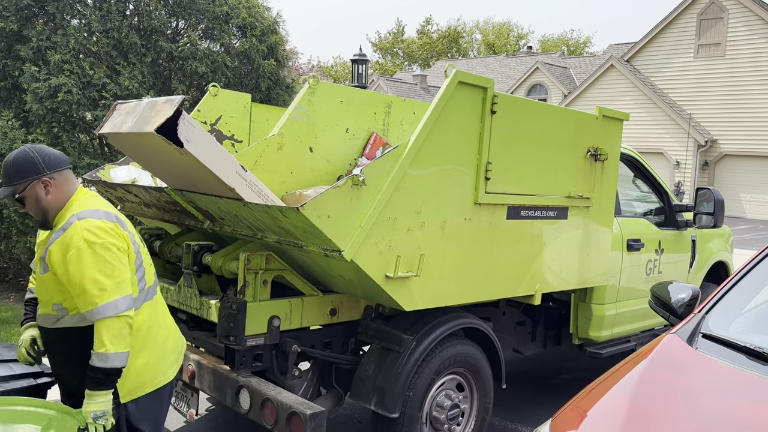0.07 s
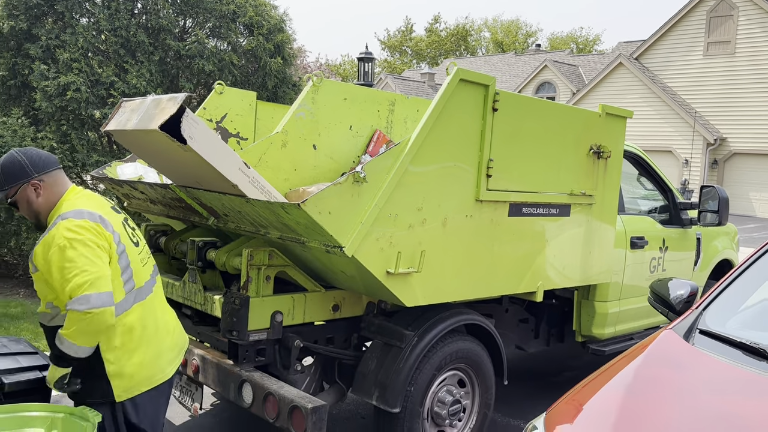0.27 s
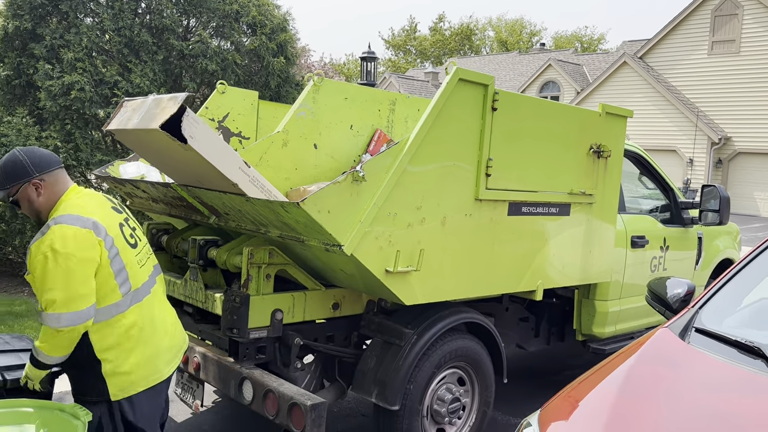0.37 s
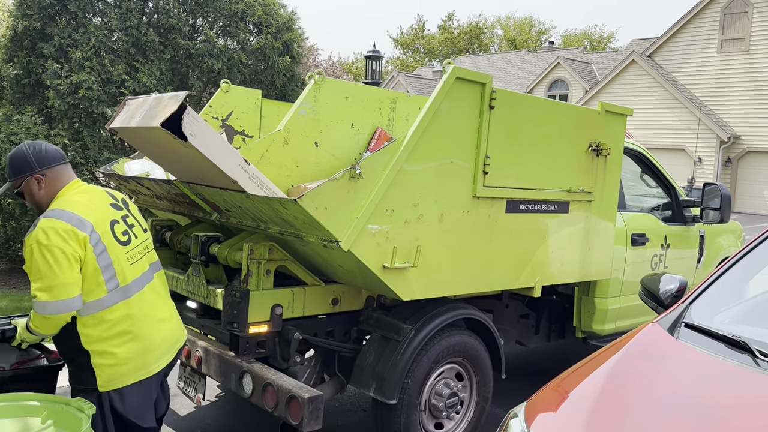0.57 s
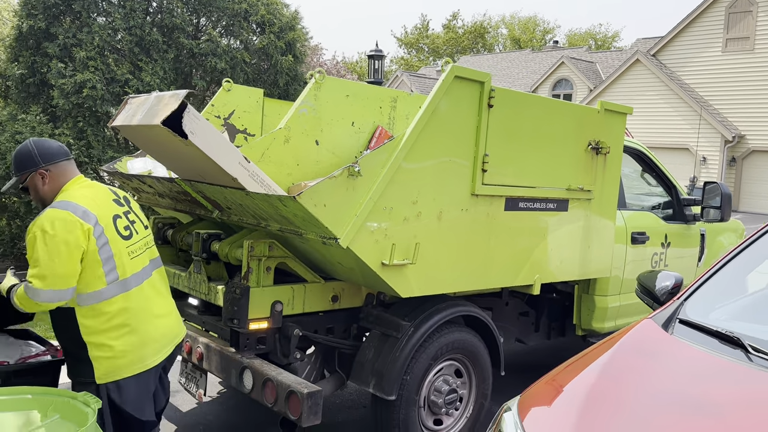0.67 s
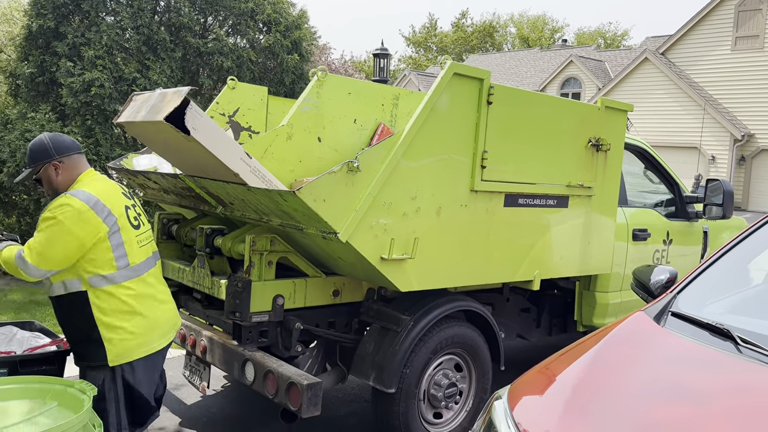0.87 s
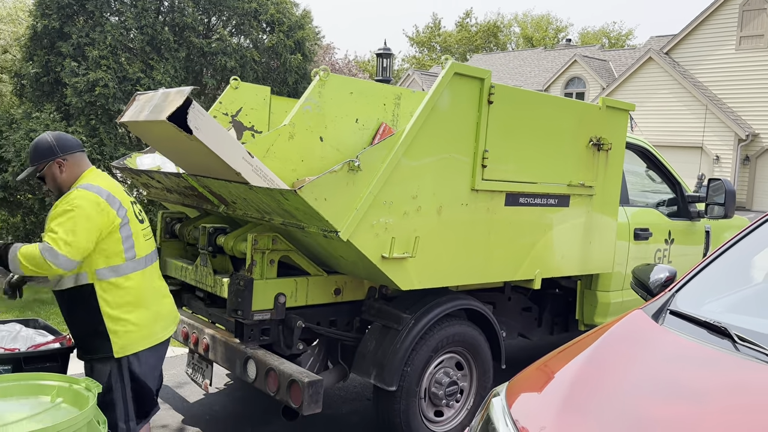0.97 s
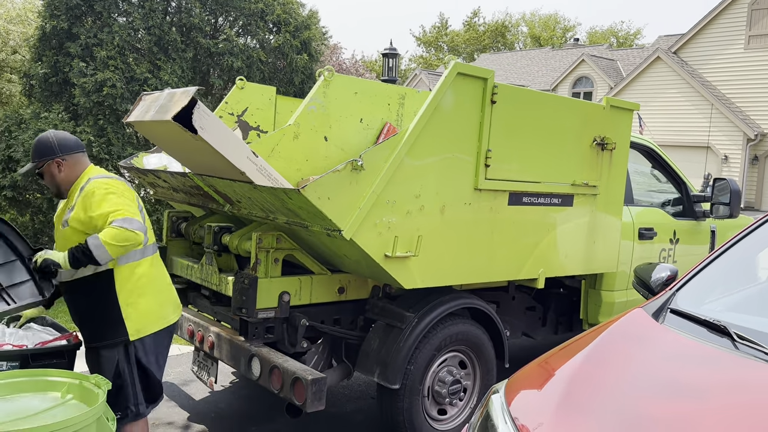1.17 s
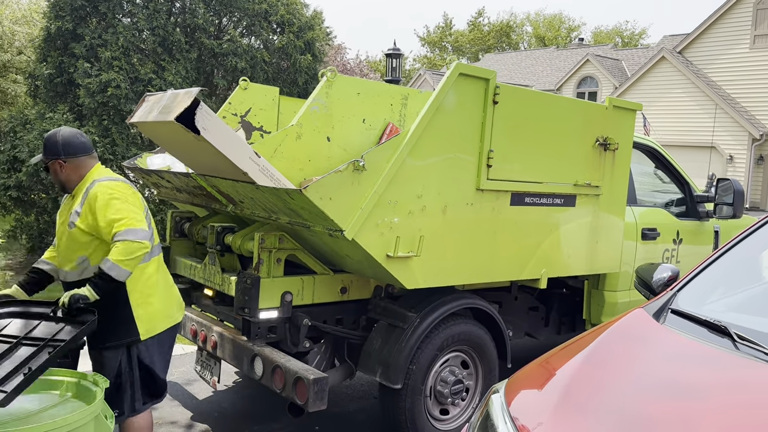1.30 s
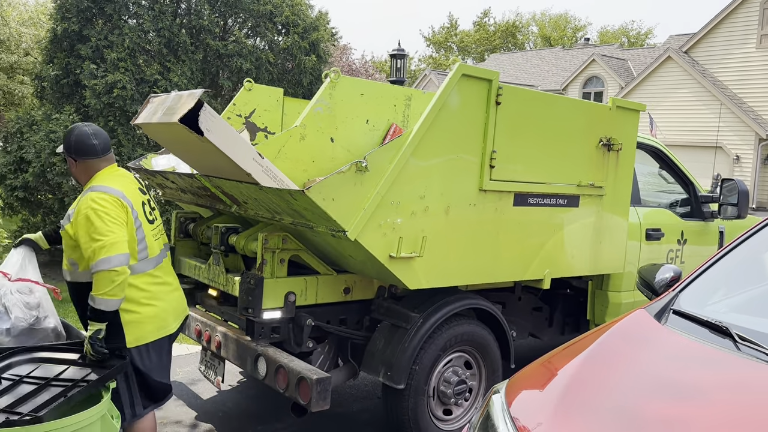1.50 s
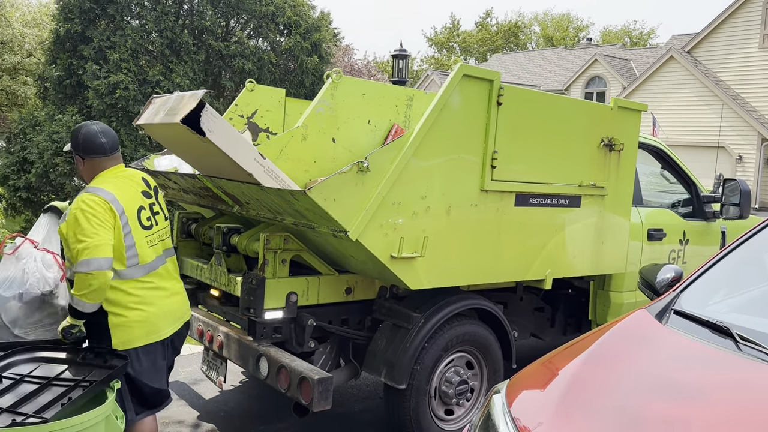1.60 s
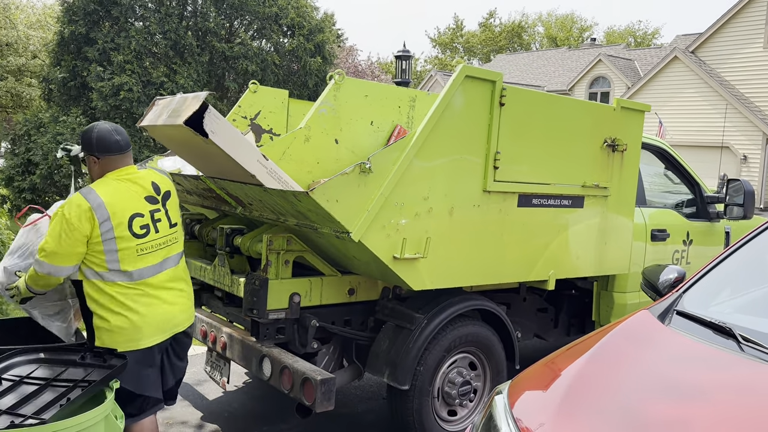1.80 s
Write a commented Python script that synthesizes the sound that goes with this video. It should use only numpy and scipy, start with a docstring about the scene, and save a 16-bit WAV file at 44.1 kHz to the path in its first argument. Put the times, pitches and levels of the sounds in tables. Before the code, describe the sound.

Plastic bin knocks and rocks, its lid bangs and a bag rustles while a truck idles.

```python
"""On a driveway, a hollow plastic wheelie bin is set down: it booms, clatters and rocks to rest.
Its lid is unlatched, flung open, slaps and bounces, and a bin bag rustles as it is lifted out.
Each impact excites damped modes: low in the hollow body, higher in the walls and rims.
The ground, a truck and house fronts scatter the knocks. Underneath, the idling truck's
firing pulses drive the resonances of its exhaust, over a wash of fan and distant traffic."""
import sys
import numpy as np
from scipy import signal
from scipy.fft import rfft, irfft
from scipy.io import wavfile
from scipy.ndimage import uniform_filter1d

SR = 44100
rng = np.random.default_rng(int(sys.argv[2]) if len(sys.argv) > 2 else 0)


def transcribe(signal):
    """Save signal, clipped to [-1, 1], as a 16-bit WAV file at the path in sys.argv[1]."""
    frames = np.atleast_2d(signal).T
    limited = np.clip(frames, -1, 1)
    pcm = np.round(limited * 32767).astype(np.int16)
    wavfile.write(sys.argv[1], SR, pcm)


N = 81585
TOP_HZ = 16000


def undb(db):
    """Amplitude ratio of a level in decibels."""
    return 10 ** (np.asarray(db) / 20)


def unit(x):
    """Normalisation to an rms of 1."""
    return x / np.sqrt(np.mean(x ** 2) + 1e-20)


def at(table, hz, column=1):
    """Interpolation of a table column along log frequency."""
    rows = np.array(table, float)
    return np.interp(np.log(np.maximum(hz, 1)), np.log(rows[:, 0]), rows[:, column])


def colour(x, spectrum):
    """Zero-phase filtering by a curve of (frequency [Hz], gain [dB])."""
    return irfft(rfft(x) * undb(at(spectrum, np.fft.rfftfreq(N, 1 / SR))), N)


def decay(t, t60):
    """Exponential damping: 60 dB in t60 seconds."""
    return np.exp(-np.log(1000) * t / max(t60, 1e-3))


def add(out, start, x):
    """Superposition of x onto out from a start time in seconds."""
    i = int(np.clip(start * SR, 0, N - 1))
    size = min(x.shape[-1], N - i)
    out[..., i:i + size] += x[..., :size]


def stereo(x, lag_s=0.0002664):
    """Path difference: sound reaches the right microphone slightly later."""
    delay = np.exp(-2j * np.pi * np.fft.rfftfreq(N, 1 / SR) * lag_s)
    return np.array([x, irfft(rfft(x) * delay, N)])


def ring(modes, t, pitch=1):
    """Modal impulse response: a sum of damped sinusoids."""
    return sum(undb(db) * np.sin(2 * np.pi * hz * pitch * t) * decay(t, t60) for hz, db, t60 in modes)


def opposed_ring(modes, t, pitch=1):
    """Interference: neighbouring modes start in antiphase, so their sum builds up and beats."""
    return sum((-1) ** k * ring([mode], t, pitch) for k, mode in enumerate(modes))


# spectrum of fan and traffic (frequency [Hz], relative level [dB])
WASH_SPECTRUM = [(40, 6.5), (150, 7.5), (250, 1.5), (360, 4.5), (520, -9), (820, 0.5), (1300, -10.5),
                 (2600, -11.5), (4000, -24), (8000, -24), (12000, -50.5), (16000, -56)]


def fan_and_traffic(level_db=-44.5):
    """Partly coherent noise: the engine fan and far traffic merge into a steady, wide wash."""
    noise = colour(rng.standard_normal((3, N)), WASH_SPECTRUM)
    return undb(level_db) * unit(0.61 * noise[0] + noise[1:])


# eight cylinders in firing order (relative level [dB])
CYLINDER_DB = [6, 0, 1.5, 4, 3, 6.5, 1.5, 1]
# exhaust pipe and body resonances (frequency [Hz], level [dB], T60 [s])
PIPE_MODES = [(40.3, -4.5, 0.11), (64.5, -1, 0.59), (80.3, -1.5, 0.24), (120.8, -6.5, .16),
              (150.3, -5.5, 0.2)]
# exhaust response (frequency [Hz], gain [dB])
EXHAUST_RESPONSE = [(20, -30), (38, -1.5), (50, 13), (80, -1.5), (100, 1.5), (155, -1), (200, -6),
                    (400, -14), (1500, -38)]


def idling_truck(firing_hz=40.23, jitter_s=0.00092, scatter_db=2, level_db=-32.5):
    """Source and filter: a train of uneven firing pulses drives the exhaust resonances."""
    pulses = np.zeros(N)
    for k, (late, size) in enumerate(rng.standard_normal((int(N / SR * firing_hz), 2))):
        pulse_db = CYLINDER_DB[k % len(CYLINDER_DB)] + scatter_db * size
        add(pulses, (k + .5) / firing_hz + jitter_s * late, undb([pulse_db]))
    pipe = opposed_ring(PIPE_MODES, np.arange(N) / SR)
    exhaust = irfft(rfft(pulses) * rfft(pipe), N)
    return undb(level_db) * unit(colour(exhaust, EXHAUST_RESPONSE))


# envelope of the rustle (time [s], level [dB])
RUSTLE_ENVELOPE = [(0, -58), (.6, -57.5), (.72, -60), (.8, -85), (1.029, -61.5), (1.18, -53.5), (1.24, -50),
                   (1.27, -45.5), (1.33, -49), (1.37, -45), (1.6, -46), (1.7, -48.5), (1.78, -49.5),
                   (1.85, -49)]
# spectrum of the film (frequency [Hz], relative level [dB])
FILM_SPECTRUM = [(300, 7), (900, 9.5), (2500, 4.5), (5000, 1.5), (9000, 4), (11500, -24.5), (14500, -1.5),
                 (16000, -36)]


def bin_bag(crinkles_per_s=5000, scatter_db=2.5):
    """Shot noise: dense, random crinkles of thin plastic film fuse into a rustle."""
    occurs = rng.random((3, N)) < crinkles_per_s / SR
    crinkles = occurs * rng.standard_normal((3, N))
    crinkles *= undb(scatter_db * rng.exponential(size=(3, N)).clip(0, 6))
    film = unit(colour(crinkles, FILM_SPECTRUM))
    envelope = undb(np.interp(np.arange(N) / SR, *np.array(RUSTLE_ENVELOPE).T))
    return (stereo(film[0]) + 1.2 * film[1:]) * envelope


# clicks of the latch (time [s], level [dB])
LATCH_CLICKS = [(1.1155, -31.5), (1.124, -34.5), (1.135, -39.5)]
# their spectrum (frequency [Hz], relative level [dB])
LATCH_SPECTRUM = [(300, -10), (800, -1), (1600, 1), (2300, -3), (3200, -2), (4000, -18.5), (9000, -31),
                  (15000, -49)]


def latch(t60=0.071):
    """Broadband transients: damped bursts of noise as the lid comes free."""
    envelope, t = np.zeros(N), np.arange(SR // 2) / SR
    for start, db in LATCH_CLICKS:
        add(envelope, start, undb(db) * decay(t, t60))
    noise = unit(colour(rng.standard_normal((3, N)), LATCH_SPECTRUM))
    return envelope * (0.35 * noise[0] + 0.79 * noise[1:])


# strikes on rims and handles (time [s], frequency [Hz], level [dB], T60 [s])
RIM_STRIKES = [(0.1050, 2517, -18.5, .05), (0.1051, 1480, -10, 0.055), (0.1063, 1060, -7.5, 0.052),
               (0.1365, 4200, -21, 0.0081), (0.1368, 5100, -20, 0.014), (0.2465, 2240, -23, 0.097),
               (0.5228, 2500, -25.5, 0.047), (0.6895, 4790, -40.5, 0.039), (1.373, 2383, -13, 0.06),
               (1.3755, 861, -12, 0.063)]
# partials of a rim (frequency ratio, relative level [dB])
RIM_PARTIALS = [(1, 1.5), (1.17, -9.5), (2.1, -16.5), (2.95, -28)]


def rim_pings(attack_cycles=0.4):
    """Inharmonic vibration: stiff rims and handles ping, and higher partials are damped sooner."""
    out, t = np.zeros(N), np.arange(SR // 4) / SR
    for start, hz, db, t60 in RIM_STRIKES:
        partials = [(hz * ratio, db + partial_db, t60 / np.sqrt(ratio))
                    for ratio, partial_db in RIM_PARTIALS if hz * ratio < TOP_HZ / 2]
        add(out, start, ring(partials, t) * (1 - np.exp(-t * hz / attack_cycles)))
    return stereo(out)


# centres of a blow's thud, knock, crack and tick (frequency [Hz])
BLOW_HZ = [250, 950, 3800, 9000]
# response of struck plastic (frequency [Hz], gain [dB])
PLASTIC_RESPONSE = [(110, -8.5), (250, -5), (480, -1.5), (900, -0.5), (1400, 2.5), (1900, 5), (2700, 1),
                    (4200, -1), (6500, 6), (9000, 4), (12000, -6), (15000, -3)]
# decay of its dense modes (frequency [Hz], T60 [s])
PLASTIC_T60 = [(150, 0.14), (900, 0.033), (4000, 0.024), (12000, 0.021)]
# scatter from ground, truck and house fronts (frequency [Hz], level [dB], T60 [s])
SCATTER = [(147, -23.5, 0.5), (905, -14, 0.41), (3960, -16, .42), (12000, -22.5, 0.5)]


def clatter(blows, attack_s=0.00065, scatter_onset_s=0.003):
    """Modal overlap: dense plastic modes ring as noise, treble first; scattering adds a longer tail."""
    t, freqs = np.arange(SR // 2) / SR, np.fft.rfftfreq(N, 1 / SR)
    noise = rfft(rng.standard_normal((5, N)))
    direct, diffuse = np.zeros((3, N)), np.zeros((2, N))
    for hz in 125 * 2 ** (np.arange(15) / 2):  # half-octave steps
        octaves_off = np.clip(np.log2((freqs + 1) / hz), -.5, .5)
        band = irfft(noise * np.cos(np.pi * octaves_off) ** 2, N)
        local_power = uniform_filter1d(band ** 2, int(6 * SR / hz) + 150, axis=-1)
        band /= np.sqrt(local_power + 1e-12)  # steadied, so the blows set the envelope
        far = undb(at(SCATTER, hz)) * (1 - np.exp(-(t / scatter_onset_s) ** 2))
        far *= decay(t, at(SCATTER, hz, column=2))
        power = np.zeros((2, N))  # direct and scattered; incoherent blows add in power
        for start, *levels, length in blows:
            rise_s = (attack_s + 1 / hz) * length ** 1.13  # longer blows start more softly
            near = (1 - np.exp(-(t / rise_s) ** 2)) * decay(t, length * at(PLASTIC_T60, hz))
            force = list(zip(BLOW_HZ, levels))
            gain = undb(at(force, hz) + at(PLASTIC_RESPONSE, hz))
            add(power, start, (gain * np.array([near, far])) ** 2)
        direct += band[:3] * np.sqrt(power[0])
        diffuse += (band[3:] + .5 * band[0]) * np.sqrt(power[1])
    return stereo(direct[0]) + direct[1:] + diffuse


def walls(blows, modes, gain_db, detune=0.0024, scatter_db=2):
    """Modal excitation: each point of contact weights the few long-ringing wall modes anew."""
    out, t = np.zeros(N), np.arange(SR // 2) / SR
    for start, *levels, _ in blows:
        force = list(zip(BLOW_HZ, levels))
        draws = rng.standard_normal((len(modes), 2))
        struck = [(hz * (1 + detune * shift), db + at(force, hz) + scatter_db * weight, t60)
                  for (hz, db, t60), (shift, weight) in zip(modes, draws)]
        add(out, start, undb(gain_db) * ring(struck, t))
    return stereo(out)


def boom(pushes, modes, swell_s):
    """Resonance: soft pushes swell the low modes of a body."""
    out, t = np.zeros(N), np.arange(SR) / SR
    for start, db, pitch in pushes:
        add(out, start, undb(db) * (1 - np.exp(-t / swell_s)) * opposed_ring(modes, t, pitch))
    return stereo(out)


# blows on the lid (time [s], thud [dB], knock [dB], crack [dB], tick [dB], length factor)
LID_BLOWS = [(1.366, -56, -28, -31, -45, 3.8), (1.374, -24, -15, -21.5, -28, 1),
             (1.393, -20, -24, -44, -43, 1.06), (1.414, -27.5, -20, -55, -37, 1.7),
             (1.4435, -35, -32, -37.5, -46, 2.1), (1.460, -25.5, -28.5, -61, -40.5, 1.5),
             (1.502, -35, -29, -44, -63, 0.74), (1.510, -43, -35.5, -25.5, -48, 0.47),
             (1.517, -27.5, -20.5, -35.5, -34.5, 1.04), (1.537, -30, -29.5, -54, -43, 1.8),
             (1.570, -31, -30.5, -44.5, -45, 2.16), (1.579, -51, -47, -36.5, -39, 0.76),
             (1.631, -28, -55, -33, -42, 0.8), (1.666, -50, -63, -49, -37.5, 0.44),
             (1.812, -59, -53, -42.5, -34, 0.17), (1.828, -30.5, -46, -50, -36, 0.77),
             (1.838, -23, -49, -43, -65, 2)]
# pushes that flex it (time [s], level [dB], pitch factor)
LID_PUSHES = [(1.378, -25.5, 0.87), (1.394, -18.5, 0.97), (1.458, -32.5, 0.92), (1.522, -21.5, 0.96)]
# its wall modes and low flexing modes (frequency [Hz], level [dB], T60 [s])
LID_WALL_MODES = [(572, -18, .4), (703, 1, 0.3), (810, 5.5, 0.29), (888, 13.5, 0.14), (960, 3.5, 0.26),
                  (1170, -20, .3), (2126, -21, .3), (2530, 1, 0.48)]
LID_FLEX_MODES = [(62, -15, .4), (84.14, -4.5, 0.66), (113.05, -2, 1), (149.4, -5, 0.7), (176, -6.5, 0.42),
                  (256, 2.5, 0.1), (344.8, -1.5, 0.29)]


def flung_lid():
    """Plate vibration: the lid rings and flexes as it slaps and bounces."""
    knocks = clatter(LID_BLOWS) + walls(LID_BLOWS, LID_WALL_MODES, gain_db=-14.5)
    return knocks + boom(LID_PUSHES, LID_FLEX_MODES, swell_s=0.003)


# blows on the bin (time [s], thud [dB], knock [dB], crack [dB], tick [dB], length factor)
BIN_BLOWS = [(0.1048, -25, -12.5, -28, -25.5, 1.04), (0.136, -13.5, -30, -12.5, -29, 0.44),
             (0.148, -17, -18, -25, -42, 0.83), (0.1895, -39, -36, -29.5, -56, 1.5),
             (0.206, -22, -25.5, -52, -65, 0.73), (0.246, -29, -37.5, -31.5, -34, 1.45),
             (0.3195, -22.5, -32, -43.5, -45, 1.3), (0.364, -44, -37.5, -48.5, -59, 2.1),
             (0.417, -29.5, -33, -67, -78, 2.6), (0.456, -31, -40, -55.5, -68, 1.4),
             (0.510, -50, -38.5, -50, -76, 1.5), (0.5215, -45, -33, -39, -44.5, 2.03),
             (0.534, -19, -63, -68, -73, 0.59), (0.664, -47, -49, -57, -69, 1),
             (0.689, -48, -48, -45.5, -48.5, 0.83)]
# pushes that set its hollow booming (time [s], level [dB], pitch factor)
BIN_PUSHES = [(0.1095, -6, 0.98), (0.156, -12, 0.99), (0.207, -33, 1), (0.322, -15.5, 0.95),
              (0.417, -18.5, .9), (0.527, -26.5, 0.9)]
# modes of its walls and of its hollow (frequency [Hz], level [dB], T60 [s])
BIN_WALL_MODES = [(427, -5.5, 0.39), (540, -5, .28), (697, 1, 0.37), (758, -0.5, 0.39), (930, 0, .22),
                  (1040, 0, 0.4), (1160, -21, .22), (1445, 7.5, 0.23), (2130, -22, .25), (2745, -10, 0.2),
                  (3133, 1, 0.2), (3890, -4.5, 0.2)]
BIN_HOLLOW_MODES = [(63, -17, 0.96), (86.8, -3.5, 0.4), (126.76, -1.5, 0.38), (151.1, -14, 1),
                    (295.5, -16.5, 0.52), (354.3, -19.5, 0.51)]


def wheelie_bin():
    """Shell and cavity resonance: the walls knock and the hollow booms as the bin rocks to rest."""
    knocks = clatter(BIN_BLOWS) + walls(BIN_BLOWS, BIN_WALL_MODES, gain_db=-12)
    return knocks + boom(BIN_PUSHES, BIN_HOLLOW_MODES, swell_s=0.0031)


def scene():
    """Linear superposition: bin, lid and bag sound over the idling truck and the wash."""
    body, lid = wheelie_bin(), flung_lid()
    slightly_right = undb([[-0.4], [0.4]])
    foreground = slightly_right * (body + latch()) + lid + bin_bag() + rim_pings()
    return foreground + idling_truck() + fan_and_traffic()


# microphone response (frequency [Hz], gain [dB])
MICROPHONE_RESPONSE = [(1500, 1), (1850, -1.5), (2300, 1), (5000, 1), (7000, -3), (7700, -8), (8400, -1.5),
                       (10000, -0.5), (11800, -27), (13200, 4), (16000, -9.5)]


def record(dry, ceiling=0.97):
    """Filtering and saturation: the microphone colours the treble, peaks are rounded, the top is cut."""
    heard = colour(dry, MICROPHONE_RESPONSE)
    rounded = heard / (1 + (heard / ceiling) ** 6) ** (1 / 6)
    lowpass = signal.ellip(8, .2, 70, TOP_HZ, fs=SR, output="sos")
    return signal.sosfilt(lowpass, rounded)


dry = scene()
out = record(dry)
transcribe(out)
```